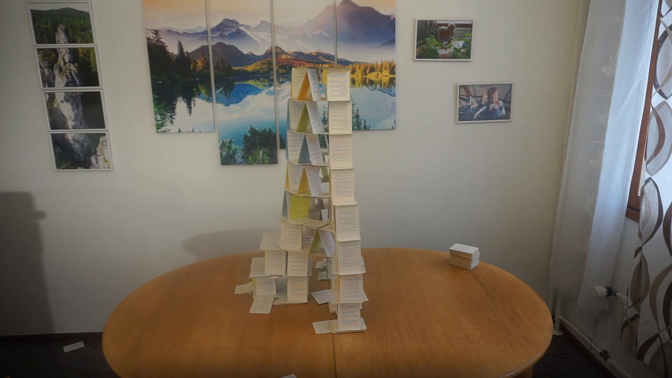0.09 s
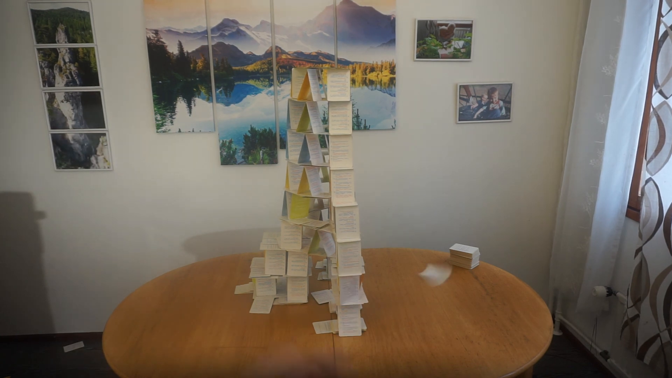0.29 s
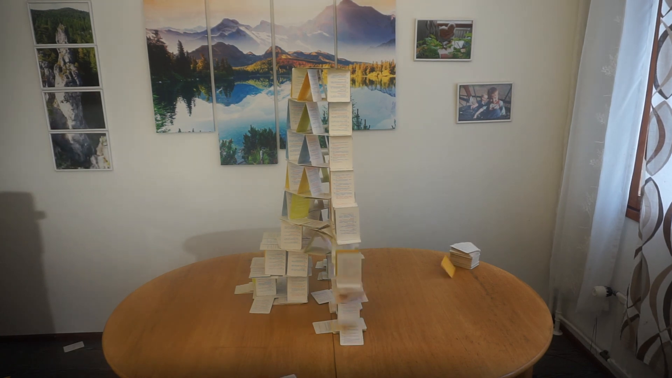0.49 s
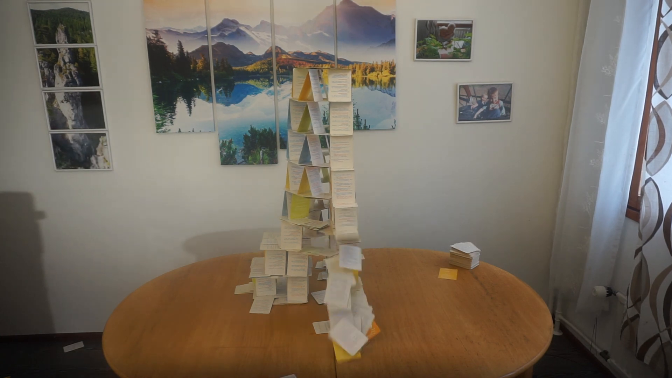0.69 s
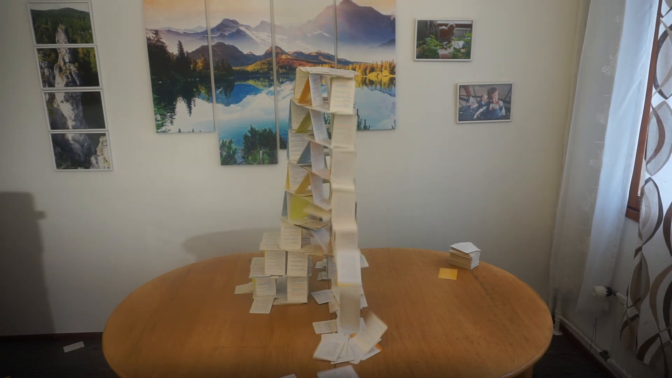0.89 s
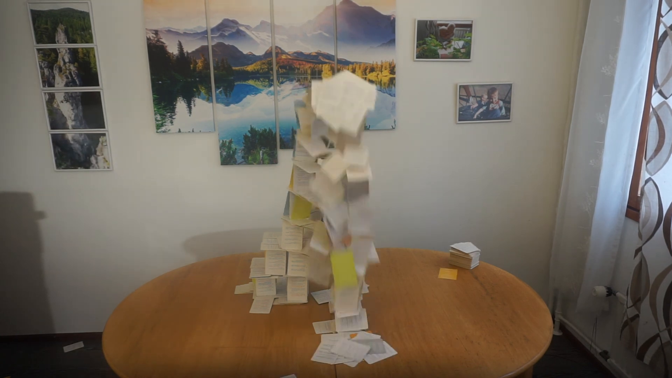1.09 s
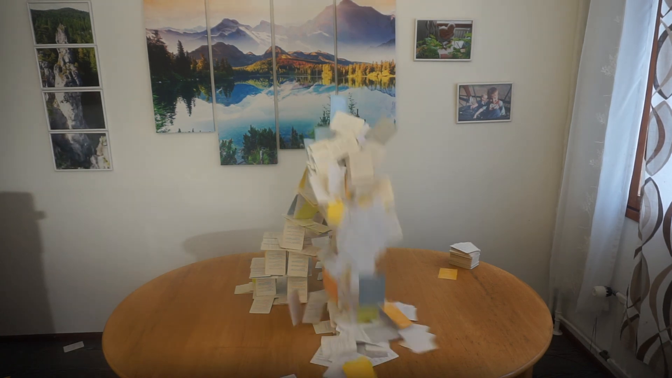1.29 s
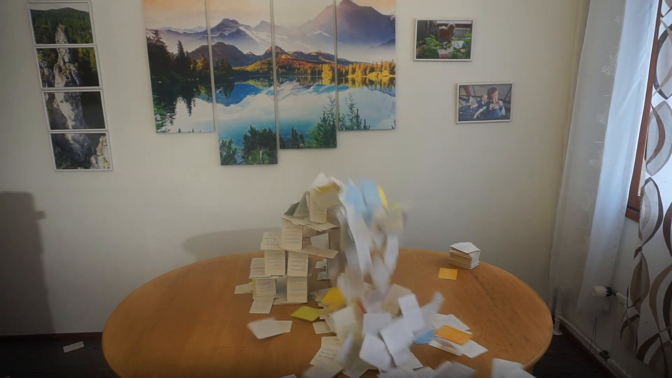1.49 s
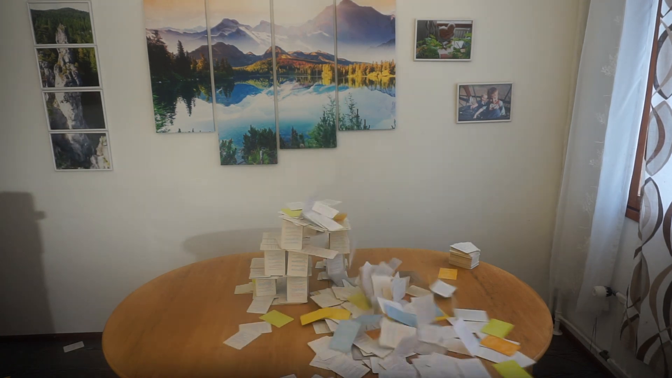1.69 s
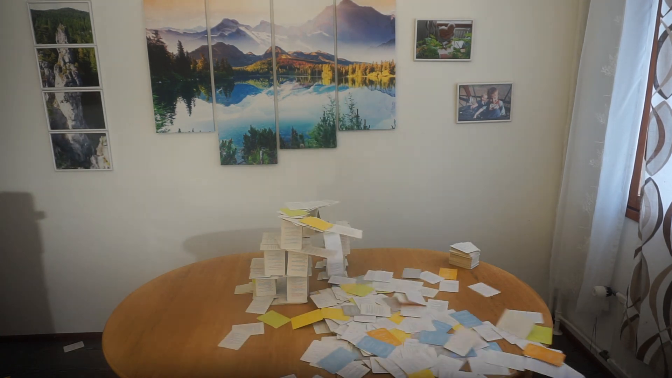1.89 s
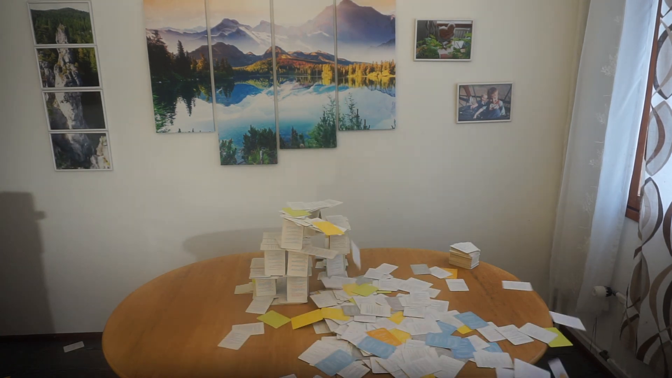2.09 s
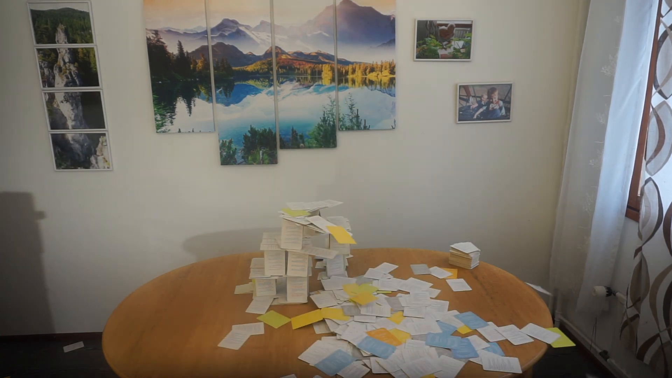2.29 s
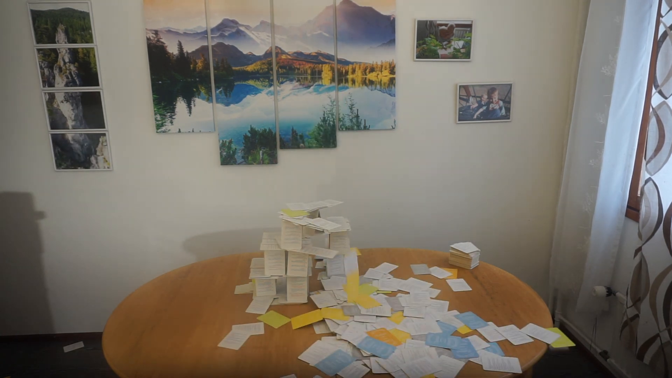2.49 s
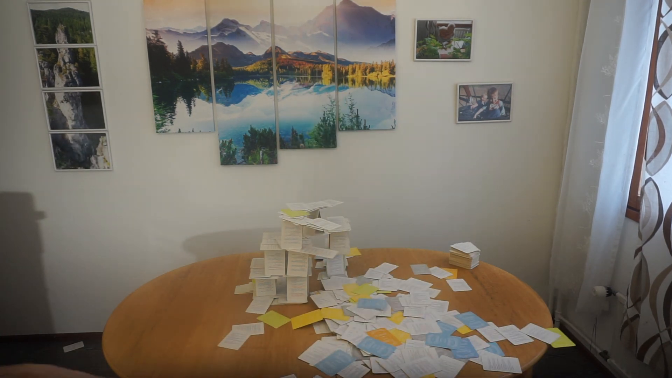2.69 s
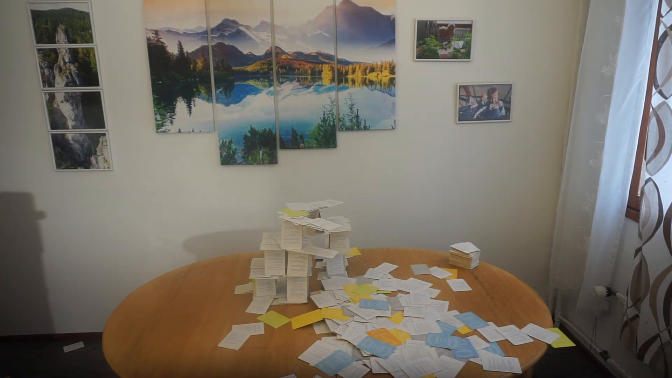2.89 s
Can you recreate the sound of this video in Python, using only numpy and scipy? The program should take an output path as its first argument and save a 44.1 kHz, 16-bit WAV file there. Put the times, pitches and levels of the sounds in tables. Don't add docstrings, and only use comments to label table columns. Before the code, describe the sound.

Playing cards tumble down in sharp papery slaps and a sliding rush, ending with hollow floor knocks

```python
import sys
import numpy as np
from scipy import signal
from scipy.fft import rfft, irfft, next_fast_len
from scipy.io import wavfile
from scipy.ndimage import uniform_filter1d, map_coordinates

SR = 44100
rng = np.random.default_rng(int(sys.argv[2]) if len(sys.argv) > 2 else 0)


def volts_from_db(level):
    exponent = np.asarray(level, float) / 20
    return 10 ** exponent


def inscribe(sig):
    pcm = np.round(np.clip(np.atleast_2d(sig).T, -1, 1) * 32767)
    wavfile.write(sys.argv[1], SR, pcm.astype(np.int16))


N = 134505

# frequency_hz, density_db
AIR_SPECTRUM = [(200, -9), (350, -16.5), (600, -22), (900, -16), (1400, -18), (3000, -24.5), (10500, -25),
                (11500, -60)]
# centre_s, level_db
HAND_PUFFS = [
    (.062, -62),
    (0.186, -45),
    (.232, -52),
]
# frequency_hz, density_db
FLICK_SPECTRUM = [(300, 1), (1500, 1), (3200, 0), (4600, 3), (8500, 6.5), (11000, -1.5)]
# frequency_hz, density_db
CARD_SPECTRUM = [(35, -30), (60, -28), (161, -10), (223, -9.5), (571, -6), (966, -1.5), (2700, -1.5),
                 (9610, -7.5), (11200, -13.5), (14600, -53), (22000, -120)]
# start_s, level_db, air_pocket_hz, spill_s,
# brightness_db_per_octave
CARD_LANDINGS = [(0.238, -6, 2100, 0.075, 1.5), (0.279, -9, 1980, 0.087, 0.2),
                 (0.368, -9.5, 2160, 0.043, -3), (0.446, -19, 2380, 0.051, -2.8),
                 (0.527, -15, 2300, 0.046, -0.2), (0.624, -15.5, 2250, 0.017, 0.5),
                 (0.677, -5, 2130, 0.031, 1), (0.714, -4.5, 3750, 0.028, 1.5),
                 (0.952, -1.5, 2700, 0.014, 0.5), (0.975, -5, 2700, 0.037, 2), (1.054, -13, 2840, 0.023, 6),
                 (1.119, -1.5, 1600, 0.018, 2.5), (1.147, -12, 2970, 0.035, -1),
                 (1.193, -3, 2900, 0.024, 4), (1.309, -3, 720, 0.039, 0.5), (1.409, -6, 2700, 0.011, 10),
                 (1.487, -30, 970, 0.035, 1), (1.595, -7, 3500, 0.029, 5), (1.629, -7.5, 1110, 0.028, -2),
                 (1.665, -7.5, 2270, 0.05, -4), (1.7, -6.5, 2070, 0.023, -1), (1.728, -7.5, 4040, 0.029, 5),
                 (1.833, -16, 1250, 0.05, 3),
    (1.925, -7.5, 2580, 0.034, 1.2),
    (1.987, -6.5, 2440, 0.041, 3),
    (2.079, -7, 1450, 0.027, -3),
    (2.108, -3.5, 1620, 0.05, 2.5),
    (2.138, -18, 1650, 0.012, -4),
    (2.388, -4.5, 2440, 0.04, 0.4),
    (2.428, -6.5, 1350, 0.03, 1.5),
    (2.469, -8, 1700, 0.036, -2),
    (2.584, -8, 4100, 0.015, 0),
                 (0.164, -30, 1490, 0.053, -1.5), (0.301, -11.5, 1140, 0.07, -1), (1.37, -8, 1130, 0.091, .5),
            (1.454, -19, 1000, 0.065, -4), (2.545, -6, 4030, 0.0097, 0), (2.651, -9.5, 3900, 0.015, -2.5),
            (2.671, -12, 4250, 0.022, -2.5), (2.748, -17, 3600, 0.025, -0.5), (2.799, -32, 3850, 0.023, -7),
            (2.902, -28.5, 3020, 0.098, -5), (2.689, -19.5, 4200, 0.014, -8),
            (.405, -23.5, 1520, .04, -2.5), (2.815, -41, 620, 0.0096, -4.5)]
# start_s, level_db, hollow_hz, spill_s, brightness_db_per_octave
FLOOR_KNOCKS = [(2.046, -9, 540, 0.0096, -1.5), (2.15, -9.5, 644, 0.01, -2), (2.335, -4.5, 563, 0.042, 2.5),
                (2.353, -8, 624, 0.041, 3), (2.372, -3, 700, 0.014, 2), (2.392, -22, 684, 0.0077, 7.5),
                (2.508, -6, 900, 0.039, -3.5), (2.743, -6.5, 660, 0.012, 0), (2.767, -23, 584, 0.012, -6),
                (2.788, -29, 610, 0.007, 0), (2.896, -16.5, 800, 0.052, -1.5), (2.918, -36, 645, 0.069, -3)]
# start_s, level_db, ring_hz, spill_s, brightness_db_per_octave
EDGE_SNAPS = [
    (.238, 1, 2200, .001, 1.5),
    (.448, -18, 7800, .002, 1.5),
    (.685, 2, 3800, .001, 0),
    (1.82, 0, 4500, .0012, 2),
    (1.825, 1, 3700, .001, 2),
    (1.99, -5, 7500, .002, 1.5),
]
# start_s, peak_db, pitch_hz, t60_s
AIR_CLAPS = [(.25, -12.5, 2200, .06), (.29, -16, 2120, .08), (.68, -11, 2850, .04), (.696, -16, 1930, .07),
             (.722, -15, 3800, .04), (.731, -24, 3300, .04), (.957, -13, 1620, 0.047),
             (1.075, -17, 1650, 0.09), (1.117, -26, 1650, 0.052), (1.143, -18, 2790, .06),
             (1.188, -23, 2280, 0.044), (1.2, -20, 2600, .07), (1.228, -14, 3250, .05),
             (1.305, -18, 730, 0.13), (1.365, -20, 900, 0.055), (1.41, -10, 2700, 0.066),
             (1.417, -15, 1180, 0.043), (1.455, -10, 1227, .07), (1.474, -22, 915, 0.029),
             (1.494, -10.5, 976, .11), (1.497, -16, 2600, .05), (1.573, -12.5, 1100, 0.061),
             (1.628, -12, 2380, .05), (1.678, -15, 2590, .07), (1.694, -10, 830, 0.039),
             (1.76, -15.5, 1114, 0.06), (1.723, -19, 843, 0.041), (1.385, -26, 1150, 0.046),
             (1.821, -20, 1226, 0.056), (.976, -16, 2780, 0.11), (1.82, -12, 3750, 0.097),
             (1.964, -14, 2650, 0.041), (2.085, -15, 1450, 0.053), (2.091, -16, 2000, .06),
             (2.128, -14, 1700, 0.077), (2.135, -19, 4250, .2), (2.675, -22, 760, 0.073),
             (2.336, -5.5, 540, 0.064), (2.344, -14, 1012, 0.15), (2.342, -12, 1484, 0.044),
             (2.39, -22, 650, 0.034), (2.39, -12, 2510, 0.09), (2.507, -15, 890, .07),
             (2.745, -17.5, 550, .06), (2.764, -15, 635, .06), (2.788, -24, 610, .05)]
# time_s, level_db, brightness_db_per_octave
SLIDE_SWELL = [(0.6, -35.5, -2), (0.72, -21, 1.4), (0.86, -26, -1.7), (1.0, -25, -0.2), (1.11, -22, -2.5),
               (1.18, -18, -.5), (1.3, -17.5, -1.3), (1.44, -19.5, 0.5), (1.56, -16.5, -0.5),
               (1.66, -17.5, 0), (1.75, -26, -0.5), (1.81, -26.5, -1), (2.38, -26, -0.4), (2.58, -31, 1),
               (2.75, -56, -4)]
# pitch_hz, width_hz, gain_db
TABLE_MODES = [(207, 7.1, 8), (232, 9.5, 8), (357, 8.5, 6.5), (431, 38, 4), (540, 32, 1.5), (717, 32, 4),
               (1013, 19, 1), (1260, 20, 3)]
# frequency_hz, t60_s
ROOM_DECAY = [(150, 0.52), (700, 0.47), (2500, 0.37), (7000, 0.23), (11000, 0.24)]
# frequency_hz, correlation
COHERENCE = [(200, 0.9), (700, 0.86), (1500, 0.57), (3000, 0.53), (6000, 0.29), (11000, 0.053)]
# frequency_hz, lead_rad
PORT_LEAD = [(300, 0.025), (2400, -0.7), (6000, -1.43), (10000, -1.7)]
# frequency_hz, difference_db
PORT_BALANCE = [(60, 0), (220, 0.0), (830, -0.5), (3110, -0.5), (11600, 5.5)]

AIR_DB, RUMBLE_DB, SHAKE_DB = -59.5, -12, -52
PUFF_LENGTH_S, PUFF_HZ = 0.022, 120
HUM_HZ, HUM_WIDTH_HZ, HUM_DB = 845, 30, -70
HUM_SWELL_S, HUM_SWELL_LENGTH_S, HUM_SWELL_DB = 0.088, 0.04, 9
FLICK_S, FLICK_RISE_S, FLICK_T60_S = 0.157, 0.003, 0.04
FLICK_DB, FLICK_LEFT_DB, FLICK_ECHO_DB = -31, 4, -5
CONTACTS_PER_S, CONTACT_SPREAD_DB = 9000, 3
SLAP_DB, SLAP_RISE_S, FIRST_CONTACT_T60_S = -12, 0.002, 0.0086
DYING_DB, RELEASE_SPILLS = 8.5, 0.53
POCKET_DB, POCKET_Q, POCKET_FIRST_DB = 4.5, 7, 6.5
HOLLOW_DB, HOLLOW_Q, HOLLOW_FIRST_DB = 24, 3.4, 4
SNAP_DB, SNAP_Q, SNAP_FIRST_DB, SNAP_ECHO_DB = 6, 6, 4, -5
CLAP_RISE_S, CLAP_ECHO_DB = 0.0015, -2.5
SLIDES_PER_S, SLIDE_SPREAD_DB, CLUMP_DB, PATCHY_DB = 12000, 2.5, 1.2, 0.8
DECK_HZ, DECK_WIDTH_HZ, DECK_DB = 2700, 100, -11.5
ROOM_DB, ROOM_DELAY_S, ROOM_LOW_HZ, ECHO_LUMP_DB = 4, 0.0027, 224, 1
CEILING_DB, TOP_HZ, TOP_SLOPE_HZ = -3, 11050, 200


def unit(x):
    return x / np.sqrt(np.mean(x ** 2) + 1e-20)


def along(points, hz):
    f, value = np.transpose(points)
    return np.interp(np.log(hz + 1), np.log(f + 1), value)


def wobble(rate):
    knots = rng.standard_normal(int(N * rate / SR) + 4)
    return map_coordinates(knots, [np.arange(N) * rate / SR])


def filtered(x, response):
    m = next_fast_len(x.shape[-1] + 8192)
    return irfft(rfft(x, m) * response(np.fft.rfftfreq(m, 1 / SR)), m)[..., :x.shape[-1]]


def causal(gain):
    cepstrum = irfft(np.log(gain + 1e-6))
    half = len(cepstrum) // 2
    cepstrum[1:half] *= 2
    cepstrum[half + 1:] = 0
    return np.exp(rfft(cepstrum))


def pair(noises, coherence):
    def mix(hz):
        angle = np.arccos(np.clip(along(coherence, hz), -1, 1)) / 2
        return np.array([np.cos(angle), np.sin(angle)])

    mid, side = filtered(noises, mix)
    return np.array([mid + side, mid - side])


def quiet_room(cards):
    t = np.arange(N) / SR
    air = filtered(rng.standard_normal((2, N)), lambda hz: volts_from_db(along(AIR_SPECTRUM, hz)) * (hz > 200))
    low = filtered(rng.standard_normal((2, N)),
                   lambda hz: 1 / (1 + (hz / PUFF_HZ) ** 4) * (hz / (hz + 50)) ** 3)
    hum = unit(filtered(rng.standard_normal(N), lambda hz: 1 / (1 + ((hz - HUM_HZ) / HUM_WIDTH_HZ) ** 2)))
    puffs = sum(volts_from_db(db) * np.exp(-((t - s) / PUFF_LENGTH_S) ** 2) for s, db in HAND_PUFFS)
    shake = volts_from_db(SHAKE_DB) * np.sqrt(np.abs(uniform_filter1d(cards ** 2, size=4000)))
    rumble = (volts_from_db(AIR_DB + RUMBLE_DB) + shake) * volts_from_db(4.0 * wobble(11))
    swell_db = HUM_SWELL_DB * np.exp(-((t - HUM_SWELL_S) / HUM_SWELL_LENGTH_S) ** 2)
    hum_level = volts_from_db(HUM_DB + swell_db + 2.2 * wobble(14))
    low_pair = unit(pair(low, [(50, 0.83)]))
    return volts_from_db(AIR_DB) * unit(pair(air, COHERENCE)) + (rumble + puffs) * low_pair + hum_level * hum


def flick():
    t = np.arange(N) / SR - FLICK_S
    rise = np.exp(np.minimum(t, 0) / FLICK_RISE_S)
    fall = volts_from_db(-60 * np.maximum(t, 0) / FLICK_T60_S)
    swish = filtered(rng.standard_normal(N), lambda hz: volts_from_db(along(FLICK_SPECTRUM, hz)))
    return volts_from_db(FLICK_DB) * np.where(t < 0, rise, fall) * unit(swish)


def contacts(size, per_s, spread_db):
    when = rng.random(size)
    strength = np.minimum(rng.exponential(1, size), 3)
    sign = rng.standard_normal(size)
    return unit((when < per_s / SR) * volts_from_db(spread_db * strength) * sign)


def slaps(landings, resonance_db, q, first_db):
    out, t = np.zeros(N + SR), np.arange(SR // 4) / SR
    for s, db, hz, spill, bright in landings:
        spill = max(spill, 0.001)
        fade_db = -DYING_DB * t / spill - 60 * np.maximum(t / spill - 1, 0) / RELEASE_SPILLS
        first = 1 + volts_from_db(first_db) * volts_from_db(-60 * t / FIRST_CONTACT_T60_S)
        rise = np.minimum(1, (t + 1 / SR) / min(SLAP_RISE_S, spill / 8))
        shape = volts_from_db(fade_db) * first * rise

        def colour(f):
            octaves = np.log2(np.clip(f, max(500, hz / 3), 2e4) / hz)
            cavity = 1 + volts_from_db(resonance_db) / np.sqrt(1 + (q * (f / hz - hz / (f + 1))) ** 2)
            return causal(volts_from_db(along(CARD_SPECTRUM, f) + bright * octaves) * cavity)

        burst = filtered(contacts(len(t), CONTACTS_PER_S, CONTACT_SPREAD_DB) * shape, colour)
        level = volts_from_db(db + SLAP_DB) * np.sqrt(np.mean(shape ** 2))
        out[round(s * SR):][:len(t)] += level * unit(burst)
    return out[:N]


def claps():
    out, t = np.zeros(N + SR), np.arange(SR // 4) / SR
    for s, db, hz, t60 in AIR_CLAPS:
        envelope = volts_from_db(db - 60 * t / max(t60, 0.01)) * (1 - np.exp(-t / CLAP_RISE_S))
        out[round(s * SR):][:len(t)] += envelope * np.sin(2 * np.pi * hz * t)
    return out[:N]


def slide():
    s, db, bright = np.transpose(SLIDE_SWELL)
    clumps = volts_from_db(CLUMP_DB * (wobble(40) + wobble(90)))
    rub = contacts(N, SLIDES_PER_S, SLIDE_SPREAD_DB) * clumps
    hz, t, z = signal.stft(rub, SR, nperseg=512)
    patches = uniform_filter1d(rng.standard_normal(z.shape), size=14, axis=0)
    patches = uniform_filter1d(patches, size=7, axis=1)
    octaves = np.log2(np.clip(hz, 200, 2e4) / 2000)
    gain = volts_from_db(along(CARD_SPECTRUM, hz)[:, None] + np.outer(octaves, np.interp(t, s, bright)))
    gain = gain * (1 + volts_from_db(DECK_DB) / (1 + ((hz[:, None] - DECK_HZ) / DECK_WIDTH_HZ) ** 2))
    swell = volts_from_db(np.interp(t, s, db, left=-90) - 2 + PATCHY_DB * unit(patches))
    gain = gain / np.sqrt(np.mean(gain ** 2, 0)) * swell
    return signal.istft(z * gain, SR, nperseg=512)[1][:N] / np.sqrt(np.mean(rub ** 2))


def wooden_top(x):
    def response(f):
        modes = sum((volts_from_db(db) - 1) / (1 + (2 * (f - hz) / width) ** 2) for hz, width, db in TABLE_MODES)
        return causal(1 + modes)

    return filtered(x, response)


def room(x):
    frames = dict(nperseg=256, noverlap=192)
    late = np.pad(x, (round(ROOM_DELAY_S * SR), 0))[:N]
    hz, t, z = signal.stft(late, SR, **frames)
    keep = volts_from_db(-120 * t[1] / along(ROOM_DECAY, hz))
    held = np.array([signal.lfilter([1 - k], [1, -k], row) for k, row in zip(keep, np.abs(z) ** 2)])
    wash = signal.stft(rng.standard_normal((2, N)), SR, **frames)[2]
    wash = wash * np.sqrt(held / np.mean(np.abs(wash) ** 2))
    diffuse = signal.istft(wash, SR, **frames)[1][:, :N]
    return pair(diffuse, COHERENCE) * volts_from_db(ECHO_LUMP_DB * wobble(80))


def scene():
    near = flick()
    bunches = slaps(CARD_LANDINGS, POCKET_DB, POCKET_Q, POCKET_FIRST_DB)
    snaps = slaps(EDGE_SNAPS, SNAP_DB, SNAP_Q, SNAP_FIRST_DB)
    notes = claps()
    flat = slaps(FLOOR_KNOCKS, HOLLOW_DB, HOLLOW_Q, HOLLOW_FIRST_DB)
    cards = bunches + flat + slide()
    sent = cards + volts_from_db(CLAP_ECHO_DB) * notes + volts_from_db(SNAP_ECHO_DB) * snaps + volts_from_db(FLICK_ECHO_DB) * near
    echoes = filtered(room(sent), lambda hz: 1 / (1 + (ROOM_LOW_HZ / (hz + 1)) ** 3))
    on_wood = wooden_top(cards + notes + volts_from_db(ROOM_DB) * echoes)
    near_pair = near * volts_from_db([[FLICK_LEFT_DB], [-FLICK_LEFT_DB]])
    return volts_from_db(-5) * (on_wood + snaps + near_pair) + quiet_room(cards)


def roll_off(x):
    return signal.sosfilt(signal.butter(12, 12190, fs=SR, output="sos"), x)


def record(dry):
    side = np.array([[0.5], [-0.5]])
    bent = dry / (1 + np.abs(dry / volts_from_db(CEILING_DB)) ** 4) ** (1 / 4)

    def ports(hz):
        slope = np.cos(np.pi / 2 * np.clip((hz - TOP_HZ) / TOP_SLOPE_HZ, 0, 1)) ** 2
        edge = np.maximum(slope, volts_from_db(-40 - np.abs(hz - TOP_HZ) / 90))
        return volts_from_db(side * along(PORT_BALANCE, hz)) * np.exp(1j * side * along(PORT_LEAD, hz)) * edge

    return roll_off(filtered(bent, ports))


dry = scene()
out = record(dry)
inscribe(out)
```